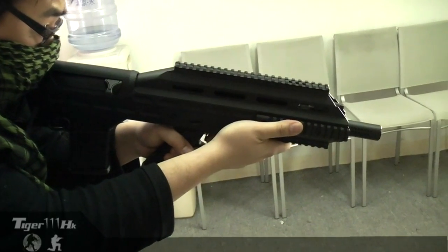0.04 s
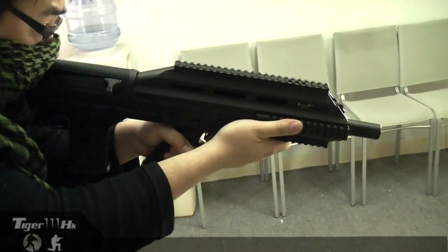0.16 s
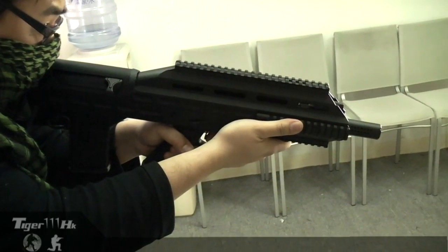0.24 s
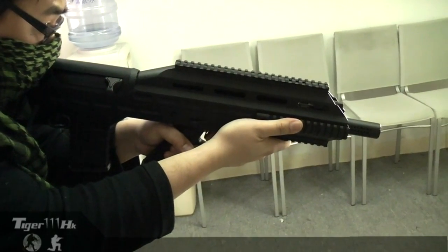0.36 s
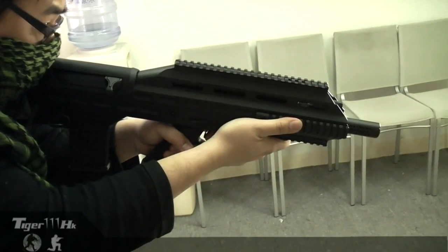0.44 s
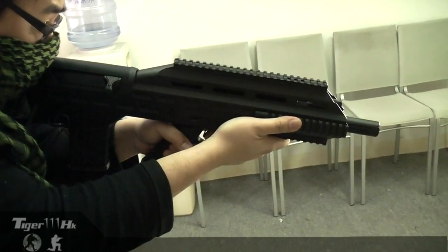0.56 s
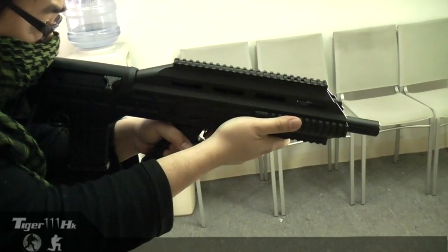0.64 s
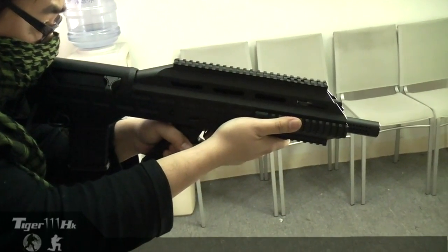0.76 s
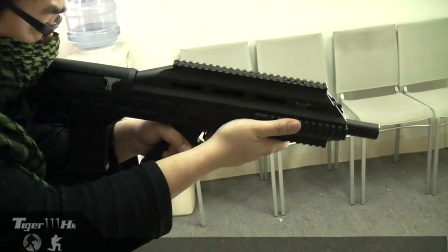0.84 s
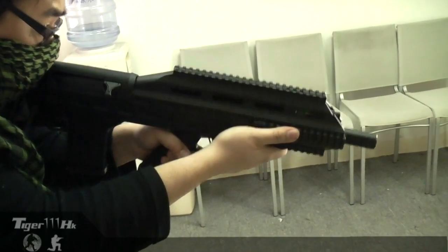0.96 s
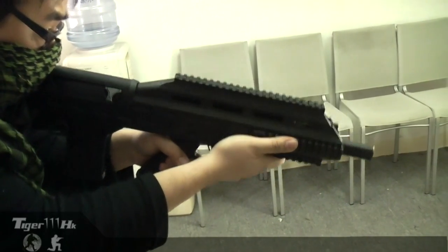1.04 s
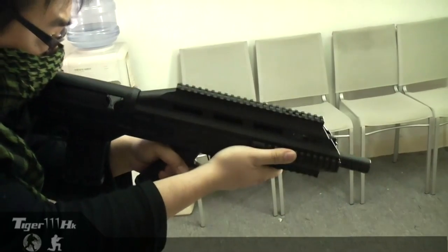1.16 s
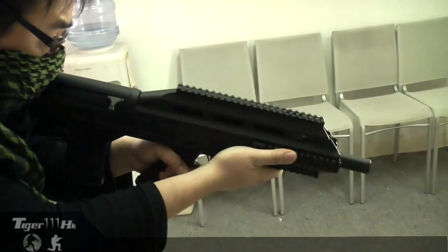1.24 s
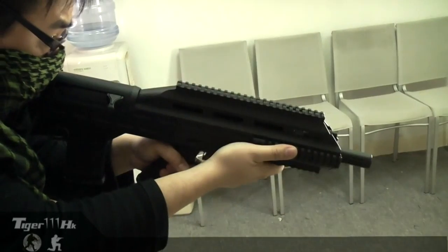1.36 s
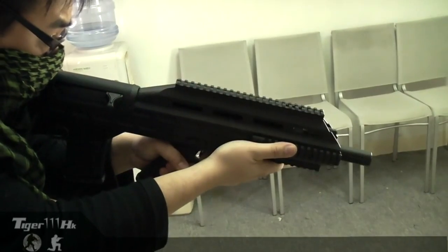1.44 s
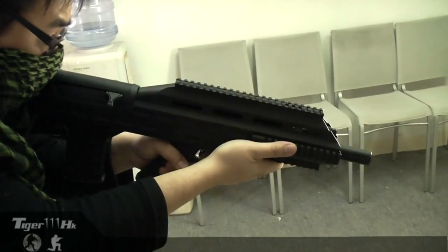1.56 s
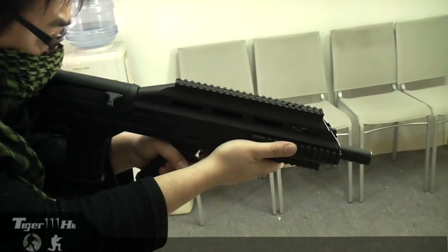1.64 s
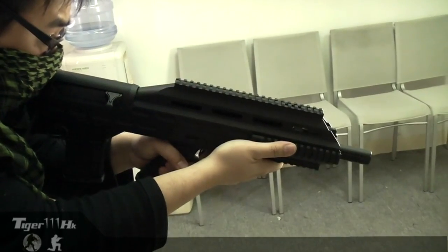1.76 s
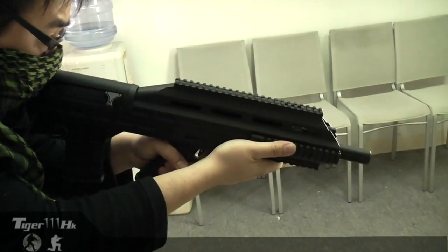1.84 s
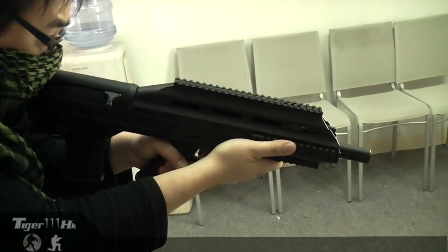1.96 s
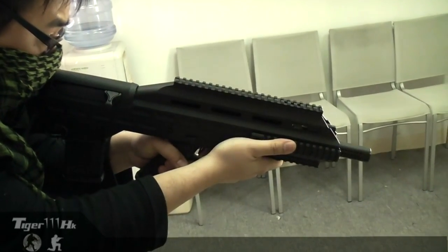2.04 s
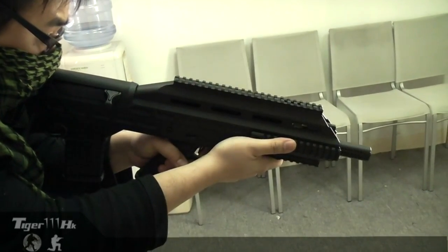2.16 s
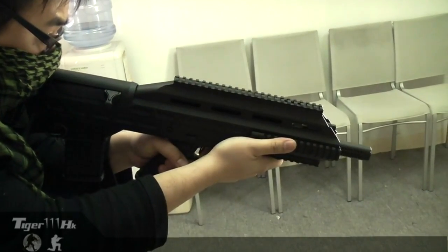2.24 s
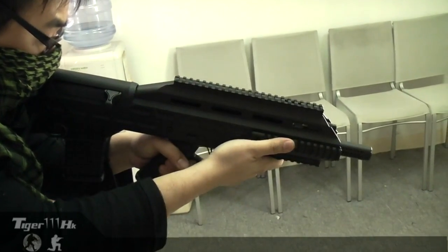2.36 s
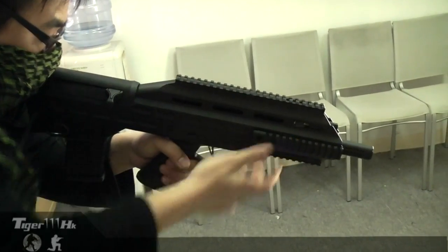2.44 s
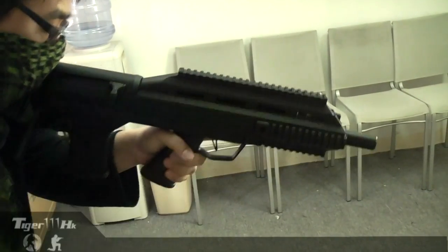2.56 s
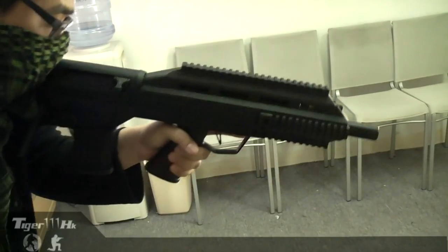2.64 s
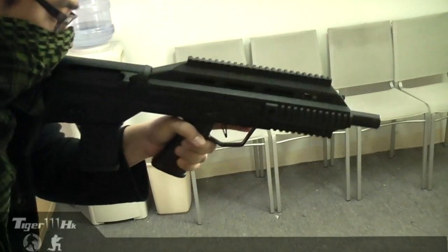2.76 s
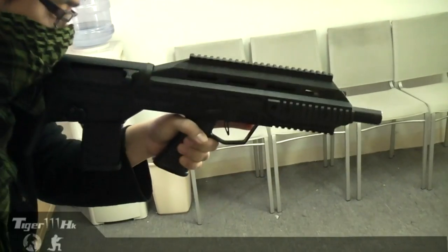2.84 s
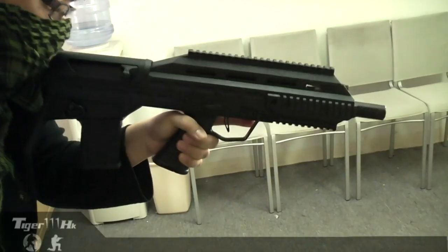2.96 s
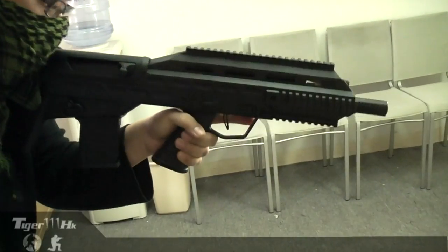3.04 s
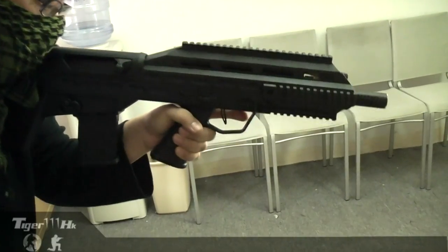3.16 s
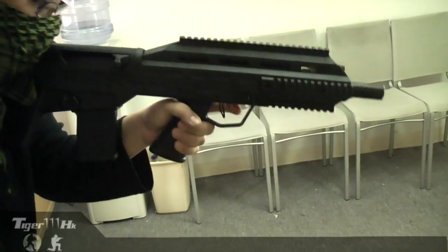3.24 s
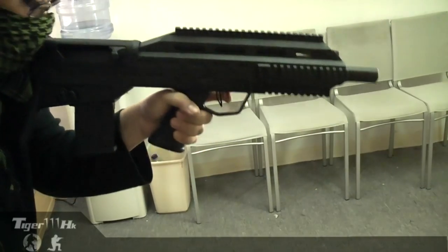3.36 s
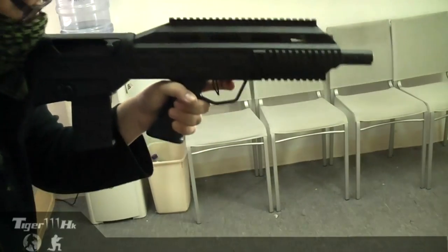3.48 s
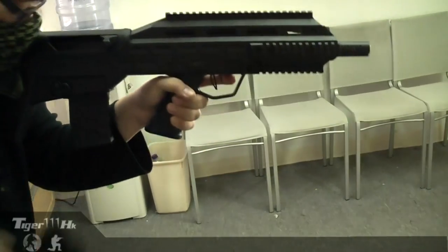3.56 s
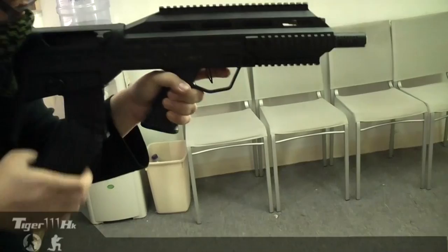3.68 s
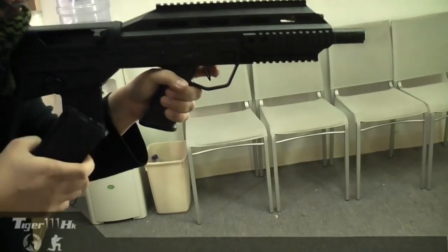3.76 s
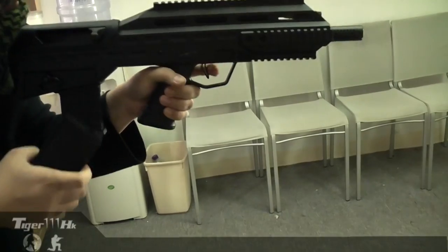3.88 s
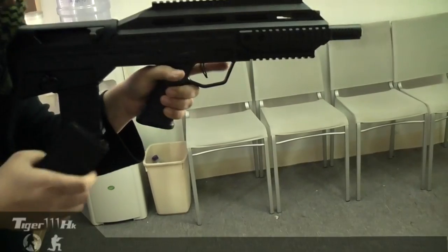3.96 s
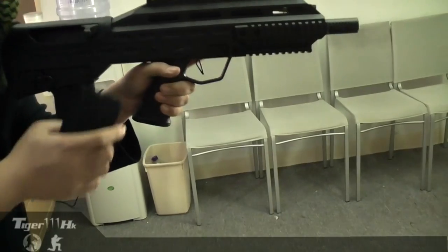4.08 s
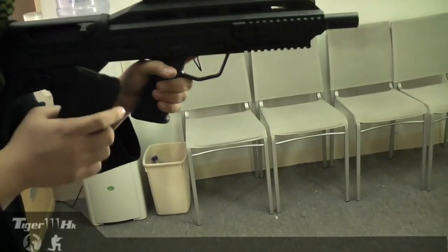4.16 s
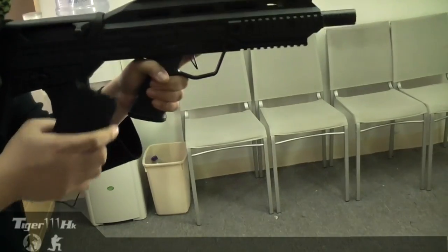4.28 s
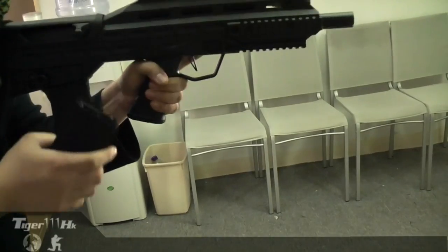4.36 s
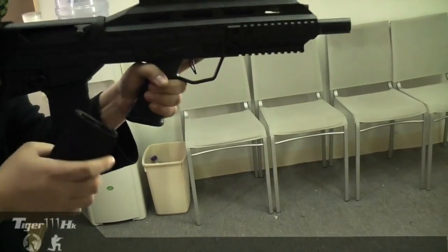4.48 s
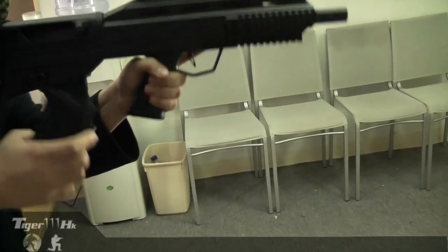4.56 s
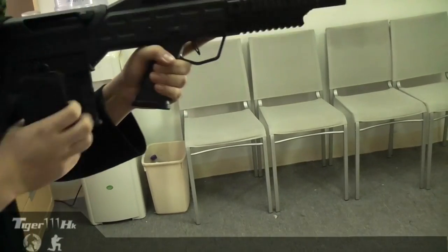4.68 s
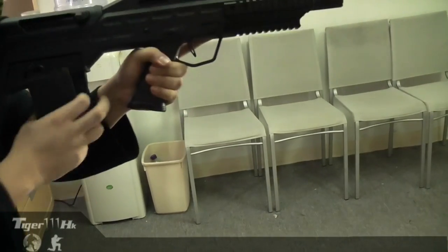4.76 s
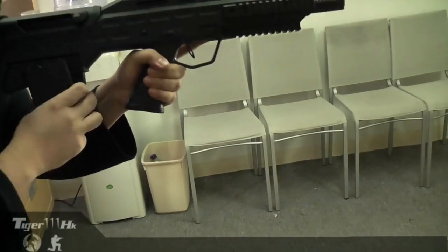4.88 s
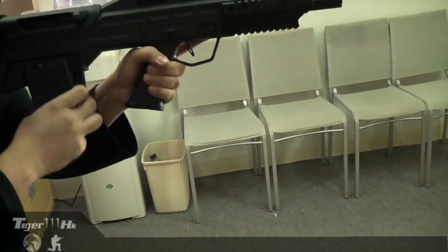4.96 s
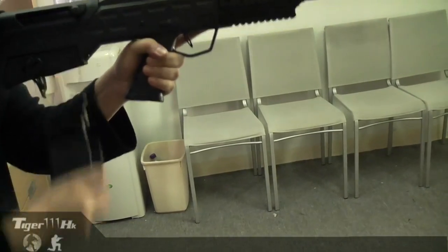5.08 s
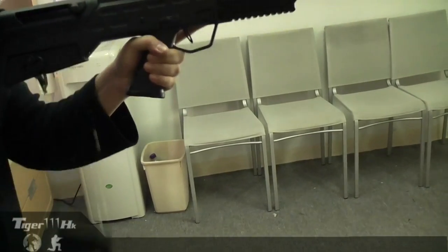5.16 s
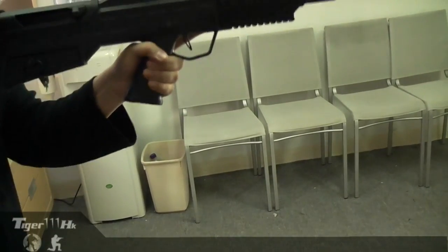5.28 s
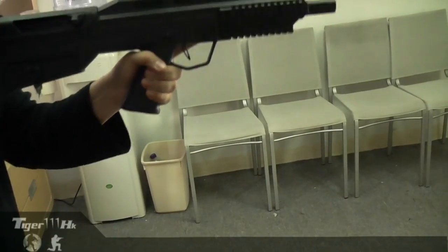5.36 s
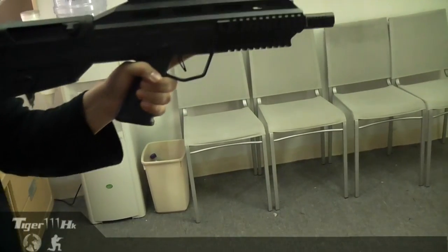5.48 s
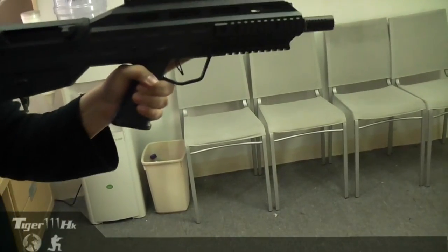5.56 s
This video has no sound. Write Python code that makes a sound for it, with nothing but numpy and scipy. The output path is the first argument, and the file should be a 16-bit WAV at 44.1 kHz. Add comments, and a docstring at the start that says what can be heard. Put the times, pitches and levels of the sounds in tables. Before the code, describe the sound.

Close to the microphone, an electric toy rifle rattles off a quick burst of snapping shots with whirring gears and hollow pellet hits, pauses for half a second, then fires another. Plastic clicks and knocks follow as the magazine comes out, loose pellets shake inside it, and it clicks firmly home. The bare room adds a short echo and a faint low hum.

```python
"""In a bare room, over a low hum, an electric toy rifle fires two automatic bursts.
In each, gears wind a spring, a piston slams home once per shot, and a moment later the pellet smacks
a hollow target. Then the magazine is pulled out, shaken so that its pellets rattle, and clicked home.
Impacts excite damped resonances, and reflections prolong them. The sound reaches two close
microphone ports, the right one more open."""
import sys
import numpy as np
from scipy import signal
from scipy.fft import rfft, irfft
from scipy.io import wavfile
from scipy.ndimage import uniform_filter1d

SR = 44100
rng = np.random.default_rng(int(sys.argv[2]) if len(sys.argv) > 2 else 0)


def wrap_up_sound(samples):
    """Save the sound to the file named by the first command line argument, as 16-bit audio."""
    columns = np.atleast_2d(samples).T
    # keep every value between -1 and 1, then stretch to whole-number steps
    tamed = np.clip(columns, -1, 1)
    steps = np.round(tamed * 32767).astype(np.int16)
    wavfile.write(sys.argv[1], SR, steps)


N = 247842

# shots: (time [s], air puff level [dB], target strike level [dB])
SHOTS = [(0.0906, -19.5, -16), (0.194, -50, -14.5), (0.28, -31, -17), (0.3633, -30, -7.5),
         (0.4484, -29.5, -18), (0.5326, -26, -11.5), (0.616, -30, -8), (0.7016, -30, -14),
         (0.7862, -29, -8.5), (0.87, -32, -15.5), (0.955, -41, -11), (1.514, -27, -15),
         (1.6125, -26, -10.5), (1.699, -48, -30), (1.7844, -28, -11), (1.87, -47, -13.5), (1.954, -36, -21),
         (2.039, -31, -16.5), (2.1238, -51, -18), (2.207, -37, -21.5), (2.293, -42, -19.5),
         (2.379, -45, -18.5)]
# trigger pulls: (motor on [s], first shot [s], motor off [s], winding growl [dB], running growl [dB],
# gear hiss [dB], whine [dB], pellet flight [s], first target mode [Hz], second target mode [Hz])
BURSTS = [(0.061, 0.085, 1.018, -28, -30.5, -25, -43, .033, 982, 676),
          (1.449, 1.509, 2.425, -34, -32.5, -25.5, -29, .033, 370, 613)]
TICK_SPREAD_DB = 2.8


def shots():
    """Impact excitation: the piston slams home and rebounds with a crack, pushing out a puff of air."""
    # modes struck by the piston: (frequency [Hz], bandwidth [Hz], gain [dB])
    crack_modes = [(796, 2100, -11.5), (2210, 810, 7), (4300, 2100, 5), (6340, 400, 2), (10150, 1400, -3.5)]
    slam_db, opening_boost_db, puff_lag_s = -0.5, 5, .003
    crack, thump = np.zeros(N), np.zeros(N)
    t = np.arange(-400, 400) / SR
    puff = np.sin(2 * np.pi * 185 * t) * np.exp(-(t / 0.0047) ** 2)
    for s, thump_db, _ in SHOTS:
        slam = blow(rise_s=.0018, fall_s=.0005, ragged=.14)
        slam += -.55 * np.roll(slam, 17)  # the rebound follows within half a millisecond
        opening = min(abs(s - burst[1]) for burst in BURSTS) < .02  # a burst's first shot hits harder
        add(crack, s, slam_db + opening_boost_db * opening, dulled(ring(slam, crack_modes)))
        add(thump, s + puff_lag_s + t[0], thump_db, puff)
    return crack, thump


def target_strikes():
    """Free vibration: after its flight each pellet smacks a hollow target, which shudders on."""
    out = np.zeros(N)
    for shot_s, _, db in SHOTS:
        *_, flight_s, first_hz, second_hz = [burst for burst in BURSTS if burst[0] < shot_s][-1]
        hit_s = shot_s + flight_s
        box_modes = [(first_hz, 170, 1.5), (second_hz, 260, 0.5), (2000, 900, -12)]
        smack = ring(blow(rise_s=.0008, fall_s=0.0021, ragged=0.32), box_modes)
        shudder = ring(blow(rise_s=0.0067, fall_s=0.014, ragged=4.8), box_modes)
        add(out, hit_s, db, ring(smack, [(775, 5300, 0)]))
        add(out, hit_s + .004, db - 7, ring(shudder, [(720, 1930, 0)]))
    return out


def motor_levels():
    """Load sets the gains of growl, winding hiss and running hiss: the motor strains, runs and tires."""
    catch_s, settle_s, strain_db, sag_db_per_s = 0.0039, 0.0081, 6, -2
    t, out = np.arange(N) / SR, 0
    for on, first, off, wind_db, run_db, hiss_db, *_ in BURSTS:
        times = [on, on + catch_s, first, first + settle_s, off]
        tired_db = sag_db_per_s * (off - first)
        growl_db = [wind_db - 39, wind_db, wind_db + strain_db, run_db, run_db + tired_db]
        winding_db = hiss_db + np.array([-44, -24, -5, -48, -71])
        running_db = hiss_db + np.array([-60, -35, -12, 0.5, tired_db])
        gains = gain_of([np.interp(t, times, db) for db in (growl_db, winding_db, running_db)])
        out = out + gains * (t > on) * (t < off)
    return out


def gears():
    """Gear noise: tooth impacts hiss and make the shell growl, modulated by the load of the spring."""
    # shell modes: (frequency [Hz], bandwidth [Hz], gain [dB])
    shell_modes = [(304, 120, 5), (670, 870, 14.5), (1075, 1100, 0), (1300, 93, 12), (2260, 450, 2)]
    # tooth hiss: (frequency [Hz], relative spectral density [dB])
    hiss_spectrum = [(880, -27), (1500, -22), (1960, -5), (2880, -4.5), (3810, -1.5), (4780, 4),
                     (6560, -3.5), (7840, -6.5), (9560, -9.5), (15100, -23.5), (16000, -24)]
    growl_gain, winding_gain, running_gain = motor_levels()
    shot_times = np.transpose(SHOTS)[0]
    drawn = np.interp(np.arange(N) / SR, shot_times, np.arange(len(SHOTS))) % 1  # 0 to 1 between shots
    load = gain_of(-9 * np.exp(-((drawn - .2) / 0.14) ** 2))  # dips after a shot, swells with the draw
    slack = gain_of(-4 * drawn ** 3)  # the hiss thins just before the spring lets go
    hiss = colour(grains(per_s=6000, spread_db=TICK_SPREAD_DB), hiss_spectrum)
    growl = evened(ring(grains(per_s=900, spread_db=4.3), shell_modes))
    shell = load * growl_gain * growl + winding_gain * hiss
    lowpass = signal.butter(6, 5230, fs=SR, output="sos")  # gears sound dull until they run free
    return signal.sosfilt(lowpass, shell) + running_gain * slack * hiss


def whine():
    """Narrow resonance: the gears sing briefly between the first two shots, coming up to speed."""
    # gear modes: (frequency [Hz], bandwidth [Hz], gain [dB])
    gear_modes = [(3690, 45, 1), (4100, 45, -1), (4700, 42, -2)]
    length_s, edge_s = 0.091, 0.017
    t, gate = np.arange(N) / SR, 0
    for _, first, _, _, _, _, db, *_ in BURSTS:
        inside_s = np.minimum(t - first, first + length_s - t)
        gate = gate + gain_of(db) * np.clip(inside_s / edge_s, 0, 1)
    singing = ring(rng.standard_normal(N), gear_modes)
    return gate * evened(ring(singing, [(4180, 1500, 0)]))


def clicks():
    """Contact transients: plastic knocks on plastic with a hollow ring and a bright tick."""
    # knocks: (time [s], level [dB], hollow resonance [Hz], relative tick level [dB])
    knocks = [(2.715, -42.5, 1250, -8), (3.108, -25.5, 890, -35), (3.276, -28, 930, -11),
              (3.371, -20.5, 2380, -2), (3.417, -18, 1090, -17), (3.577, -16.5, 2240, -10.5),
              (3.634, -21.5, 2320, -26), (3.72, -32, 1920, -1), (3.807, -25, 1370, -16),
              (3.89, -21, 1800, -11), (3.896, -17, 1840, -10), (3.906, -16, 2000, -10),
              (4.021, -46, 1420, 1), (4.341, -24.5, 606, -28), (4.346, -19, 1680, 0),
              (4.672, -19.5, 2300, -35), (4.701, -23.5, 2050, -30), (4.734, -18, 1980, -11),
              (4.789, -19, 1530, -8), (4.802, -13, 1640, 9.5), (4.927, -8.5, 1760, -7),
              (4.929, -19, 785, -28), (4.945, -27, 2065, 7), (5.04, -24, 2070, -35), (5.067, -10, 2110, -8),
              (5.068, -15.5, 775, -30), (5.103, -11, 1800, -2), (5.141, -9.5, 1960, -2),
              (5.541, -9, 1630, -24), (5.546, -4, 1610, -35), (5.554, -4, 1670, -27),
              (5.569, -7.5, 1630, -37), (5.603, -4.5, 1670, -27)]
    # bright modes of the plastic: (frequency [Hz], bandwidth [Hz], gain [dB])
    tick_modes = [(4330, 1000, 3), (5160, 1600, -7), (7500, 2500, -1)]
    out = np.zeros(N)
    for s, db, hz, tick_db in knocks:
        push = blow(rise_s=.0004, fall_s=0.0014, ragged=0.67)
        add(out, s, db, ring(ring(push, [(hz, 600, 0)]), [(hz, 1200, 0)]))
        add(out, s, db + tick_db, dulled(ring(np.diff(push), tick_modes)))
    return out


def shake_levels():
    """Incoherent addition: the powers of the shakes sum, giving bright, hollow and deep gains."""
    # pellet shakes and hand rubs: (peak time [s], rise [s], level [dB], decay [dB/s],
    # relative hollow level [dB], relative deep level [dB])
    shakes = [(1.347, .004, -59.5, 70, -25, -2), (2.831, 0.045, -47, 61, -0.5, -6.5),
              (3.12, 0.037, -57.5, 42, 1.5, -4), (3.296, 0.044, -31.5, 101, -6, -7.5),
              (3.373, 0.02, -26.5, 128, -6, -13.5), (3.445, 0.047, -28, 116, -12, -12),
              (3.53, 0.022, -31.5, 107, -9, -15), (3.635, 0.011, -37.5, 152, -2, -26),
              (3.721, .015, -34, 134, -6.5, -15), (3.78, .02, -38, 88, -5, -14),
              (3.824, .015, -36, 90, -2, -29), (3.89, 0.012, -26, 98, -6, -24),
              (4.02, 0.016, -29, 214, -7.5, -13), (4.347, 0.0084, -21.5, 327, -7, -11),
              (4.648, 0.067, -45.5, 104, -8, -7), (4.71, 0.048, -31, 104, -5, -16),
              (4.8, 0.033, -25.5, 113, -5, -13), (4.87, 0.013, -32.5, 117, 2.5, -13),
              (4.928, 0.008, -38.5, 126, -24, 3), (5.066, 0.0027, -25.5, 127, -11, -7.5),
              (5.16, 0.15, -28.5, 54, -3.5, -45), (5.3, 0.047, -31.5, 44, -8.5, -12.5),
              (5.455, 0.017, -32.5, 61, -17, -16), (5.545, 0.0046, -51, 5, 13.5, -13.5)]
    t, power = np.arange(N) / SR, 0
    for s, rise_s, db, decay, hollow_db, deep_db in shakes:
        swell = np.clip(1 + (t - s) / rise_s, 0, 1) ** 1.4
        envelope = swell * gain_of(db - decay * np.maximum(t - s, 0))
        power = power + (envelope * gain_of([[0], [hollow_db], [deep_db]])) ** 2
    return np.sqrt(power)


def rattle():
    """Granular collisions: pellets move in bunches, ticking on each other and on the hollow magazine."""
    slow_noise = uniform_filter1d(uniform_filter1d(rng.standard_normal(N), 500), 500)
    bunching = gain_of(1.46 * evened(slow_noise))
    bright, hollow, deep = shake_levels() * bunching
    wall = ring(grains(per_s=1500, spread_db=1.76), [(1320, 140, -.5), (1900, 1800, -.5)])
    wall = evened(ring(wall, [(1660, 740, 0)]))
    body = ring(grains(per_s=700, spread_db=0.85), [(650, 240, -1.5), (1110, 910, -0.068)])
    body = evened(ring(body, [(880, 710, 0)]))
    # pellet on pellet: (frequency [Hz], relative spectral density [dB])
    pellet_spectrum = [(1180, -44), (2000, -5), (2490, -6), (3610, -4), (4230, -2), (5680, -5.5),
                       (9410, -13.5), (14700, -31.5), (16000, -39)]
    ticks = colour(grains(per_s=4500, spread_db=TICK_SPREAD_DB), pellet_spectrum)
    return bright * ticks + hollow * wall + deep * body


def echoes(x):
    """Early reflections: hard surfaces return delayed copies, strongest in the upper middle."""
    # floor, ceiling and walls: (delay [s], gain [dB])
    reflections = [(.0049, -5), (.011, -7), (.0172, -10), (.019, -11), (.025, -11)]
    bounced = ring(x, [(4800, 4000, 0)])
    return sum(gain_of(db) * np.r_[np.zeros(round(s * SR)), bounced][:N] for s, db in reflections)


def room_tails():
    """Reverberant decay: sparse reflections die at each band's own rate; two sets of three tails."""
    # room decay: (frequency [Hz], reverberation time T60 [s])
    decay_times = [(150, 0.78), (500, 0.45), (1500, 0.47), (4000, 0.5), (12000, 0.38)]
    taps = np.zeros((6, SR))
    arrivals = np.arange(400, SR - 20, 20) + rng.integers(0, 20, (6, (SR - 401) // 20))
    np.put_along_axis(taps, arrivals, rng.choice([-1., 1.], arrivals.shape), 1)
    hz, t, bands = signal.stft(taps, SR, nperseg=256)
    decay = gain_of(-60 * t / read(decay_times, hz)[:, None])
    tails = signal.istft(bands * decay, SR, nperseg=256)[1]
    return (tails / np.linalg.norm(tails[0])).reshape(2, 3, -1)


def room(x):
    """Reverberation, crossfaded among three tails so that it stays smooth and does not ring."""
    crossfade = np.sqrt(2 / 3) * np.cos(np.pi * (5.3 * np.arange(N) / SR + np.arange(3)[:, None] / 3))
    return signal.fftconvolve((x * crossfade)[None], room_tails(), axes=2)[..., :N].sum(1)


def hum():
    """Ambient noise: a steady low room hum, turned down during the bursts and brought back afterwards."""
    # room hum: (frequency [Hz], relative spectral density [dB])
    hum_spectrum = [(12, -41), (25, -17), (45, -7), (90, -7), (118, -16), (180, -1.5), (262, -4),
                    (607, -11.5), (802, -11.5), (1130, -16), (1400, -19.5), (4060, -20.5), (16000, -47)]
    # hand-set curve for the recorder's gain on the hum: (time [s], level [dB])
    gain_curve = [(0, -49), (1.2, -61), (1.34, -58.5), (1.45, -49.5), (2.6, -70), (2.951, -58), (3.4, -47),
                  (5.62, -51)]
    gain = gain_of(np.interp(np.arange(N) / SR, *np.transpose(gain_curve)))
    return gain * np.array([colour(noise, hum_spectrum) for noise in rng.standard_normal((2, N))])


def gain_of(db):
    """Amplitude ratio of a level in decibels."""
    return 10 ** (np.asarray(db) / 20)


def evened(x):
    """Normalisation to rms 1."""
    return x / np.sqrt(np.mean(x ** 2) + 1e-20)


def read(points, hz):
    """Interpolation on a log-frequency axis."""
    f, value = np.transpose(points)
    return np.interp(np.log(hz + 1), np.log(f + 1), value)


def colour(x, points):
    """Spectral shaping, at rms 1."""
    return evened(irfft(rfft(x) * gain_of(read(points, np.fft.rfftfreq(N, 1 / SR))), N))


def ring(x, modes):
    """Damped resonators in parallel: (frequency [Hz], bandwidth [Hz], gain [dB])."""
    out = 0
    for hz, width, db in modes:
        pole = np.exp((2j * np.pi * hz - np.pi * width) / SR)
        out = out + gain_of(db) * 2 * signal.lfilter([1 - abs(pole)], [1, -pole], x).real
    return out


def dulled(x):
    """Low-pass filtering: plastic gives little of the highest treble."""
    return signal.lfilter(*signal.butter(2, 9000, fs=SR), x)


def add(mix, s, db, sound):
    """Superposition: a sound joins the mix at time s with peak level db."""
    part = mix[round(s * SR):][:len(sound)]
    part += (gain_of(db) * sound / abs(sound).max())[:len(part)]


def grains(per_s, spread_db):
    """Shot noise: random ticks of either sign; a few are large."""
    size = gain_of(spread_db * np.minimum(rng.exponential(1, N), 4)) * rng.choice([-1., 1.], N)
    return size * (rng.random(N) < per_s / SR)


def blow(rise_s, fall_s, ragged):
    """Contact force: an impulse inside a short noise burst."""
    t = np.arange(3000) / SR
    envelope = np.minimum(t / rise_s, 1) ** 2 * np.exp(-np.maximum(t - rise_s, 0) / fall_s)
    force = ragged * rng.standard_normal(3000) * envelope
    force[round(rise_s * SR)] = 1
    return force


def scattering(x):
    """Scattering at the microphone housing randomises phase and keeps the overall power."""
    bands = signal.stft(x, nperseg=128)[2]
    scrambled = bands * np.exp(2j * np.pi * rng.random(bands.shape))
    return evened(signal.istft(scrambled, nperseg=128)[1][:N]) * x.std()


def scene():
    """Direct plus reverberant sound: (the left port's unshared field, the right port's field)."""
    crack, thump = shots()
    sharp = crack + clicks()
    steady = gears() + whine() + rattle()
    far = target_strikes()
    reverberant = room(gain_of(-2.5) * sharp + gain_of(-5.5) * steady + gain_of(-2) * far)
    early = sharp + echoes(sharp) + gain_of(1) * steady + far
    field = np.array([scattering(early), early]) + reverberant
    highpass = signal.butter(8, 130, "high", fs=SR, output="sos")  # small bodies radiate no deep bass
    return signal.sosfilt(highpass, field) + thump + hum()


def limiter(pair):
    """Compression: both channels duck about 1 ms after a loud peak on the right, then clip softly."""
    threshold_db, release_db_per_s, duck_db_per_db = -12.5, 122, 0.39
    power_db = 10 * np.log10(abs(uniform_filter1d(pair[1] ** 2, 60)) + 1e-12)
    fall = np.arange(N) * release_db_per_s / SR
    held_db = np.maximum.accumulate(power_db + fall) - fall
    over_db = np.maximum(held_db - threshold_db, 0)
    duck_db = duck_db_per_db * signal.lfilter([.02], [1, -.98], over_db)
    return 1.428 * np.tanh(pair / gain_of(duck_db) / 1.442)


def record(dry):
    """Acoustic shadowing: the left port is shaded and late; a limiter and a band limit follow."""
    # microphone response: (frequency [Hz], gain [dB])
    response = [(6000, 4.5), (10000, 5.5), (13000, 2.5), (16000, 2)]
    # likeness of the ports: (frequency [Hz], correlation [0-1])
    correlation = [(25, .8), (60, .35), (125, .95), (500, .9), (1500, .7), (4000, .5), (12000, .35)]
    # left port against right: (frequency [Hz], gain [dB])
    left_gain = [(25, 0), (60, -2), (125, -7.5), (400, -8), (1300, -13.5), (4400, -13), (8000, -8),
                 (15000, -18)]
    # left port against right: (frequency [Hz], phase [rad])
    left_phase = [(30, -1), (260, -0.73), (1460, -1.5), (2300, -2.5), (4300, -2), (15000, -3.5)]
    hz = np.fft.rfftfreq(N, 1 / SR)
    unshared, right = rfft(dry) * gain_of(read(response, hz))
    alike = np.clip(read(correlation, hz), 0, 1)
    shadow = gain_of(read(left_gain, hz)) * np.exp(1j * read(left_phase, hz))
    left = (alike * right + np.sqrt(1 - alike ** 2) * unshared) * shadow
    band_limit = signal.firwin(511, cutoff=15950, window=("kaiser", 9), fs=SR)
    return signal.oaconvolve(limiter(irfft([left, right], N)), band_limit[None], "same")


dry = scene()
out = record(dry)
wrap_up_sound(out)
```